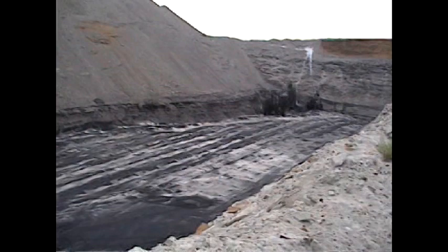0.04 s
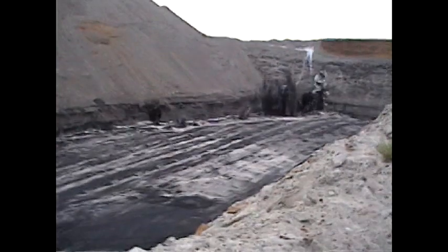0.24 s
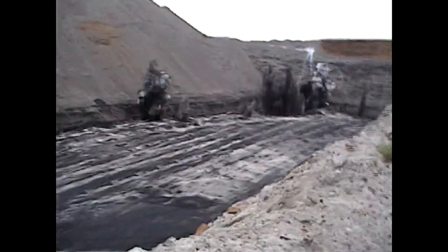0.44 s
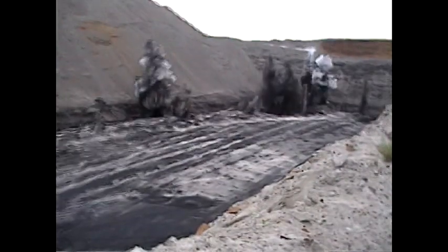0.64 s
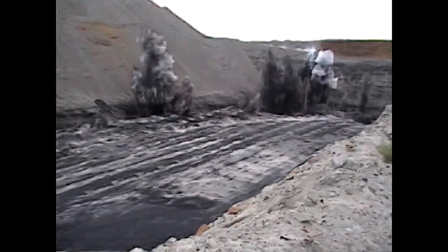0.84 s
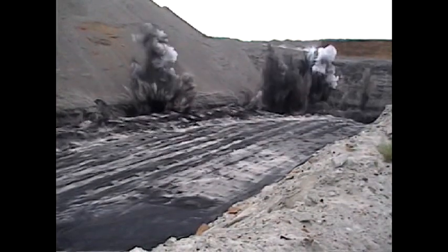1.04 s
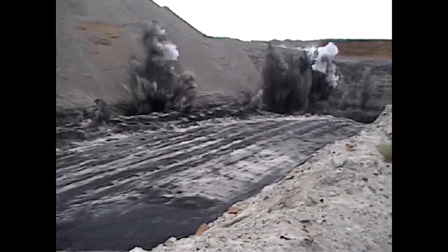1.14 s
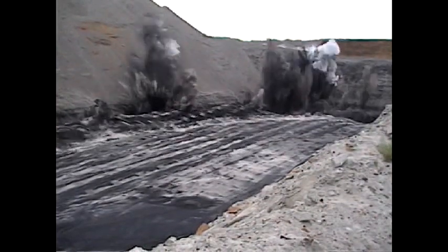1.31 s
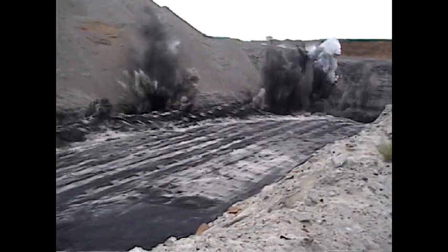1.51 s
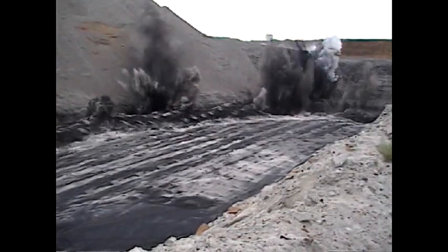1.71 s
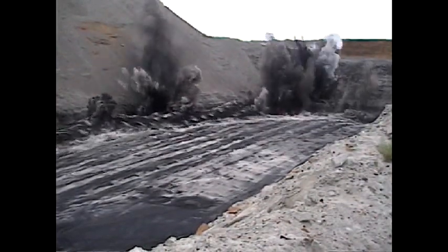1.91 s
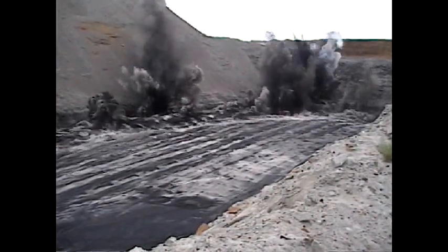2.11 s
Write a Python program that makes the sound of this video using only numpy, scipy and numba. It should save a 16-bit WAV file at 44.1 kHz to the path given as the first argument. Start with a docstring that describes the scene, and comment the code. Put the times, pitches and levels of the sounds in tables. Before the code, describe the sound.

Explosive charges go off in an open pit mine. Faint ground thuds lead into sharp cracks and crackling rock, then more bangs, rushing gas and a rumbling roar that slowly fades, heard from the rim on a small microphone.

```python
"""Faint thuds and ticks of loose grit come first: the ground wave of a row of charges in an open pit
mine, heard from the rim. Then the air shocks crack, each volley scatters off the rock faces and
splitting rock crackles. Gas rushes out of the holes, the lifted rock rumbles, and echoes and flying
rock merge into a slowly dying roar. A small microphone ducks and clips on the hardest shocks."""
import sys
import numpy as np
from scipy import signal
from scipy.fft import rfft, irfft, next_fast_len
from scipy.io import wavfile
from numba import njit

SR = 44100
rng = np.random.default_rng(int(sys.argv[2]) if len(sys.argv) > 2 else 0)


def output_pcm(signal):
    """Save a mono or channel-first signal as 16-bit PCM at the path in sys.argv[1].

    Samples are clipped to [-1, 1] before scaling.
    """
    pcm = np.clip(np.atleast_2d(signal).T, -1, 1) * 32767
    wavfile.write(sys.argv[1], SR, np.round(pcm).astype(np.int16))


N = 94815

# The hard hits. Each row: start in seconds, level in dB, overpressure length in ms, treble edge in Hz.
AIR_SHOCKS = [(.2442, -10, .7, 10000), (.2446, -17, .12, 9000), (.2460, -11, .6, 4000),
              (.2481, -16, 1.3, 1300), (.2714, -19, .7, 1800), (.2752, -10.5, .3, 6000),
              (.2801, -11, .28, 7000), (.2829, -23, .5, 3000), (.3678, -22, .9, 3000),
              (.3745, -23, .8, 2000), (.6030, -23, .7, 2000), (.6325, -21, .3, 3500),
              (.7880, -18.5, 1.4, 900), (.7992, -19, .4, 4000), (.8026, -20, .8, 1400),
              (.8092, -17, 1.3, 900), (.8530, -26, 1.5, 1200), (.8703, -23, .4, 3000),
              (.8714, -23, .9, 1100), (.9320, -24, 1.2, 900), (.9577, -8, .2, 1850), (.9607, -20, 1.5, 700),
              (1.0035, -27, .4, 3000)]
SMEAR_DB, SMEAR_FALL_S, SHOCK_LOW_CUT_HZ = -29, 0.0029, 71


def air_shocks():
    """Each shock snaps up and sinks into longer suction; distance rounds it, the ground smears it."""
    out = np.zeros((2, N))
    t = np.arange(SR // 20) / SR
    for start, db, length_ms, edge_hz in AIR_SHOCKS:
        age = 1000 * t / length_ms  # suction begins at 1
        wave = dull((1 - age) * np.exp(-age), edge_hz, order=3)
        mid, side = undb(SMEAR_DB) * np.exp(-t / SMEAR_FALL_S) * rng.standard_normal((2, len(t)))
        paths = (t == 0) + mid + undb(-14.5) * side * np.array([[1], [-1]])  # direct hit plus smear
        shock = signal.fftconvolve(paths, wave[None] / wave.max())[:, :len(t)]
        i = int(start * SR)
        out[:, i:i + len(t)] += undb(db) * shock
    return low_cut(out, SHOCK_LOW_CUT_HZ, order=1)


# Volleys thrown back by the rock faces. Each row: crest in seconds, level in dB, rise and fall in
# seconds, treble edge in Hz, bass edge in Hz.
VOLLEY_SWELLS = [(0.248, -37, 0.0018, 0.01, 3620, 150), (0.255, -33, 0.0046, 0.012, 3580, 450),
                 (0.333, -34, 0.12, 0.097, 4900, 70), (0.37, -42, 0.03, 0.0098, 1000, 200),
                 (.415, -49, 0.012, 0.014, 9000, 150), (0.536, -43, 0.059, 0.018, 7900, 120),
                 (0.598, -32, 0.045, 0.025, 2200, 80), (0.63, -35, 0.0055, 0.037, 2920, 50),
                 (0.742, -39.5, 0.063, 0.034, 3540, 50), (0.779, -36.5, 0.014, 0.0089, 1200, 200),
                 (0.802, -34, .005, 0.0041, 5040, 200), (0.831, -37.5, 0.0071, 0.019, 1200, 100),
                 (0.854, -35.5, 0.061, 0.046, 587, 80), (0.919, -33, 0.0058, 0.015, 950, 40),
                 (0.974, -31.5, 0.0037, 0.012, 1290, 60), (1.007, -31.5, 0.0077, 0.0057, 4000, 200),
                 (1.033, -35.5, 0.0067, 0.027, 1200, 40), (1.13, -35, 0.015, 0.021, 9000, 1500),
                 (1.52, -42.5, 0.03, 0.044, 500, 131)]
# Their thick low-mid body. Each row: frequency in Hz, gain in dB.
VOLLEY_EQ = [(30, -48), (80, -8), (160, -4), (350, 0), (600, -0.5), (1100, -3.5), (2000, -8.5), (3500, -10),
             (6500, -12.5), (9500, -21), (12000, -46), (15000, -52)]


def volleys():
    """Rough rock faces break each volley into a crackling crowd of small shocks."""
    crowd = patter(VOLLEY_EQ, per_second=4500, spread_db=1.5)
    out = np.zeros((2, N))
    for crest, db, rise, fall, treble_hz, bass_hz in VOLLEY_SWELLS:
        thinned = crowd - dull(crowd, bass_hz, order=1)
        out += undb(db) * swell(crest, rise, fall) * unit(dull(thinned, treble_hz, order=1))
    return out


# Single sharp cracks. Each row: start in seconds, level in dB.
ROCK_CRACKS = [(0.2744, -23), (.2802, -27), (0.293, -31), (0.2934, -46), (.2980, -43), (0.3026, -22.5),
               (0.306, -20), (.3098, -22.5), (0.314, -27), (0.3228, -26), (.3267, -29), (.3342, -41),
               (.3450, -35), (.3682, -33), (0.3826, -25.5), (0.387, -33), (.4040, -30), (0.4149, -27),
               (.4190, -31), (0.444, -29), (0.4598, -33.5), (0.634, -38.5), (0.9592, -35.5)]
# The bite of the cracks and the fizz of the finer crackle. Each row: frequency in Hz, gain in dB.
CRACK_EQ = [(100, 3), (900, 11.5), (3000, 4), (6000, 7.5), (9500, 1), (12000, -23), (15500, -24)]
CRACKLE_EQ = [(100, -6), (800, 1), (3000, -1), (7000, 2), (10000, -1), (12000, -2.5), (15500, -7)]
CRACKLE_DB, CRACKLE_END_S = -39.5, 0.6


def splitting_rock():
    """Splitting rock spits separate sharp cracks over a finer crackle that soon stops."""
    bursts = sum(undb(db) * swell(start, rise_s=0.0001, fall_s=0.0007) for start, db in ROCK_CRACKS)
    cracks = bursts * noise(CRACK_EQ)
    crackle = patter(CRACKLE_EQ, per_second=1600, spread_db=3.5)
    envelope = swell(crest_s=0.28, rise_s=0.091, fall_s=0.05) * (np.arange(N) / SR < CRACKLE_END_S)
    return cracks + undb(CRACKLE_DB) * envelope * crackle


# The bright tone of the escaping gas. Each row: frequency in Hz, gain in dB.
JET_EQ = [(40, -41), (100, 3.5), (300, -4.5), (600, 4.5), (1300, -1), (2200, -4), (3300, -4.5), (6300, -5),
          (8700, -11), (10200, -17.5), (12000, -43), (15000, -70)]
JET_DB = -35.5


def gas_jet():
    """Gas tears out of the holes with a bright, grainy rush."""
    rush = patter(JET_EQ, per_second=12000, spread_db=1.0)
    return undb(JET_DB) * swell(crest_s=1.07, rise_s=0.048, fall_s=0.16, hold_s=0.18) * rush


# The darker tone of the long tail. Each row: frequency in Hz, gain in dB.
ROAR_EQ = [(30, -3), (80, -2), (180, -2.5), (350, 1.5), (600, 2), (1200, -1), (2000, -5), (3300, -7),
           (6300, -10), (8700, -17.5), (10200, -22), (12000, -48), (15000, -76)]
ROAR_DB = -40


def pit_roar():
    """Echoes and flying rock merge into a roar that dies slowly in the pit."""
    echoes = patter(ROAR_EQ, per_second=9000, spread_db=1.0)
    return undb(ROAR_DB) * swell(crest_s=1.174, rise_s=0.13, fall_s=0.68, hold_s=0.22) * echoes


# Surges of the rock mass. Each row: crest in seconds, level in dB, rise and fall in seconds.
HEAVE_SWELLS = [(.12, -62, 0.044, 0.034), (0.245, -48, 0.0025, 0.022), (.68, -49, 0.018, .015),
                (.778, -35.5, 0.022, 0.028), (.90, -44, 0.022, 0.025), (1.04, -42.5, 0.072, 0.21),
                (1.208, -37, 0.0068, 0.0053), (1.34, -51, 0.027, .04), (1.84, -57.5, 0.15, 0.021)]
# Their deep bass weight. Each row: frequency in Hz, gain in dB.
HEAVE_EQ = [(20, -13), (45, 9.5), (90, 2.5), (180, 0.5), (400, -4.5), (1500, -69)]


def rock_heave():
    """The lifted rock pushes out a low rumble."""
    surges = sum(undb(db) * swell(crest, rise, fall) for crest, db, rise, fall in HEAVE_SWELLS)
    return surges * noise(HEAVE_EQ)


# The faint lead-in. Each row: start in seconds, level in dB, fall in seconds, centre in Hz.
GROUND_THUDS = [(0.011, -60, 0.0084, 1000), (.031, -52, 0.0017, 1000), (0.038, -46, 0.0025, 840),
                (0.059, -42, 0.0036, 146), (.061, -50, .005, 550), (0.063, -47, 0.005, 1220),
                (0.129, -52.5, 0.007, 1120), (0.152, -42, 0.0015, 970), (0.173, -38, 0.0045, 160),
                (0.174, -38.5, 0.01, 390), (0.186, -50, 0.0062, 1170), (0.229, -54, 0.036, 860)]
THUD_RISE_S, RATTLE_ABOVE_HZ = 0.00071, 550


def ground_wave():
    """Thuds run through the ground ahead of the air shocks; deep ones knock, higher ones rattle."""
    t = np.arange(N) / SR
    out = np.zeros((2, N))
    for start, db, fall, hz in GROUND_THUDS:
        knock = np.cos(2 * np.pi * hz * (t - start))
        rattle = stereo(noise_band(hz))
        blend = (RATTLE_ABOVE_HZ * knock + hz * rattle) / np.hypot(hz, RATTLE_ABOVE_HZ)
        out += undb(db) * swell(start, THUD_RISE_S, fall) * blend
    return out


# Tiny ticks close by. Each row: start in seconds, level in dB.
GRIT_TICKS = [(0.0466, -46.5), (.0605, -63), (0.0928, -53), (0.1005, -55), (0.11, -59.5), (.116, -59.5),
              (0.127, -56), (0.142, -55), (.158, -61.5), (0.188, -65), (.227, -79), (0.24, -50)]
# Their thin, brittle tone. Each row: frequency in Hz, gain in dB.
GRIT_EQ = [(500, -25), (1800, 6), (2800, -8), (3600, 3), (4200, 11.5), (5000, 5.5), (6200, -7), (7800, -1),
           (11000, -11.5), (15000, -23)]


def loose_grit():
    """Grit ticks nearby as the ground wave shakes it loose."""
    ticks = sum(undb(db) * swell(start, rise_s=0.00031, fall_s=0.0033) for start, db in GRIT_TICKS)
    return ticks * noise(GRIT_EQ)


# The soft, dark bed under the blast. Each row: frequency in Hz, gain in dB.
AIR_EQ = [(25, -11), (80, -2), (400, 1), (1000, -7), (2000, -17.5), (4000, -26.5), (9000, -34.5),
          (15000, -50)]
AIR_DB = -60


def open_air():
    """The air at the rim is a faint, steady hush."""
    return undb(AIR_DB) * noise(AIR_EQ)


def undb(db):
    return 10 ** (np.asarray(db) / 20)


def unit(x):
    """Scale to rms 1."""
    return x / np.sqrt(np.mean(x ** 2))


def equalise(x, eq):
    """Causal filter through (Hz, dB) points."""
    size = next_fast_len(N + N // 8, True) // 2 * 2
    hz, db = np.array(eq, float).T
    gain = undb(np.interp(np.log(np.fft.rfftfreq(size, 1 / SR) + 1), np.log(hz), db))
    cepstrum = irfft(np.log(gain))
    cepstrum[1:size // 2] *= 2  # fold to minimum phase, so nothing rings ahead of a hit
    cepstrum[size // 2 + 1:] = 0
    return irfft(rfft(x, size) * np.exp(rfft(cepstrum)))[..., :N]


def dull(x, hz, order):
    """Roll off the treble."""
    return signal.sosfilt(signal.butter(order, min(hz, SR / 2 - 1000), fs=SR, output="sos"), x)


def low_cut(x, hz, order):
    """Roll off the bass."""
    return signal.sosfilt(signal.butter(order, hz, "high", fs=SR, output="sos"), x)


def swell(crest_s, rise_s, fall_s, hold_s=0):
    """Exponential rise to the crest, hold, exponential fall."""
    t = np.arange(N) / SR - crest_s
    return np.exp(np.minimum(t, 0) / rise_s - np.maximum(t - hold_s, 0) / fall_s)


def noise_band(hz):
    """Two unrelated broad bands of noise around one centre."""
    edges = [hz / np.sqrt(3), min(hz * np.sqrt(3), SR / 2 - 1000)]
    band_pass = signal.butter(2, edges, "band", fs=SR, output="sos")
    return unit(signal.sosfilt(band_pass, rng.standard_normal((2, N))))


def noise(eq):
    """Smooth stereo noise shaped by an EQ, at rms 1."""
    return unit(equalise(stereo(rng.standard_normal((2, N))), eq))


def patter(eq, per_second, spread_db):
    """Grainy stereo texture shaped by an EQ, at rms 1: many weak pulses and a few strong ones."""
    hits = rng.random((2, N)) < per_second / SR
    strength = undb(spread_db * np.minimum(rng.exponential(size=(2, N)), 4))
    polarity = np.sign(rng.standard_normal((2, N)))
    return unit(equalise(stereo(hits * strength * polarity), eq))


# The width of the two microphone ports. Each row: frequency in Hz, side against mid in dB.
WIDTH_EQ = [(40, -19), (150, -18), (600, -20), (1500, -19), (3000, -16.5), (8000, -11), (14000, -7)]


def stereo(pair):
    """Left and right from a mid and a side signal; only the treble is wide."""
    mid, side = pair
    return mid + np.array([[1], [-1]]) * equalise(side, WIDTH_EQ)


def scene():
    """The full mix; volleys, cracks, gas and roar stay muted until the first shock arrives."""
    arrived = np.arange(N) / SR > AIR_SHOCKS[0][0]
    blast = arrived * (volleys() + splitting_rock() + gas_jet() + pit_roar())
    return blast + rock_heave() + air_shocks() + open_air() + ground_wave() + loose_grit()


@njit
def follow(x, attack_s, release_s):
    """Level follower with separate rise and fall times."""
    attack = 1 - np.exp(-1 / (attack_s * SR))
    release = 1 - np.exp(-1 / (release_s * SR))
    out, level = np.empty(len(x)), 0.
    for i in range(len(x)):
        level += (x[i] - level) * (attack if x[i] > level else release)
        out[i] = level
    return out


# The voice of the small microphone. Each row: frequency in Hz, gain in dB.
MICROPHONE_EQ = [(30, -7), (100, -0.5), (1000, 0.5), (3000, 2), (3950, 0), (4500, -6), (5800, -3.5),
                 (8000, -3), (15000, -6.5)]
LOW_CUT_HZ, TOP_CUT_HZ = 36, 15900
LIMIT_DB, LIMIT_ATTACK_S, LIMIT_RELEASE_S = -21, 0.004, 0.008
CLIP_DB, CLIP_KNEE = -17.5, 6


def record(dry):
    """Microphone tone and low cut, a fast limiter, clipping of what slips past it, and a top cut."""
    picked_up = low_cut(equalise(dry, MICROPHONE_EQ), LOW_CUT_HZ, order=2)
    level = follow(np.abs(picked_up).max(axis=0), LIMIT_ATTACK_S, LIMIT_RELEASE_S)
    ducked = picked_up / np.maximum(1, level / undb(LIMIT_DB))
    clipped = ducked / (1 + np.abs(ducked / undb(CLIP_DB)) ** CLIP_KNEE) ** (1 / CLIP_KNEE)
    return signal.sosfilt(signal.ellip(8, .2, 70, TOP_CUT_HZ, fs=SR, output="sos"), clipped)


dry = scene()
out = record(dry)
output_pcm(out)
```